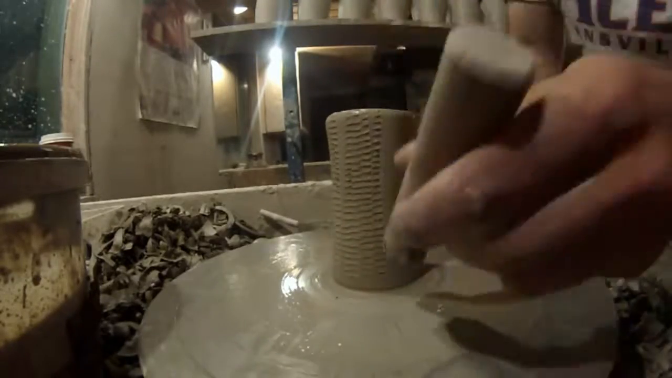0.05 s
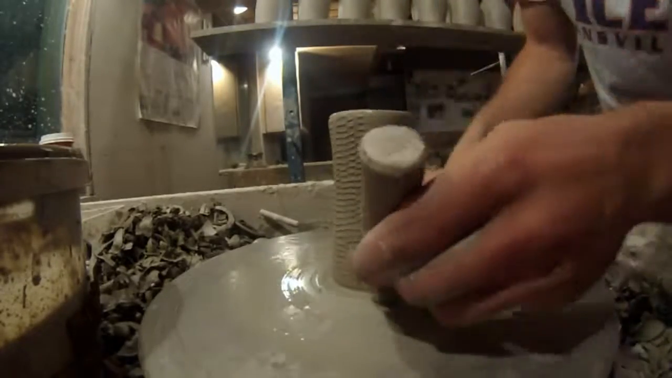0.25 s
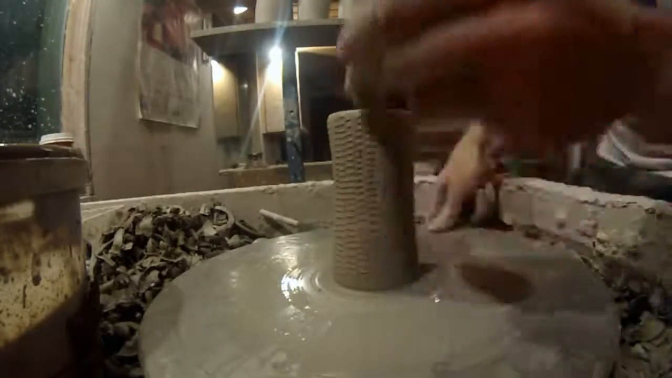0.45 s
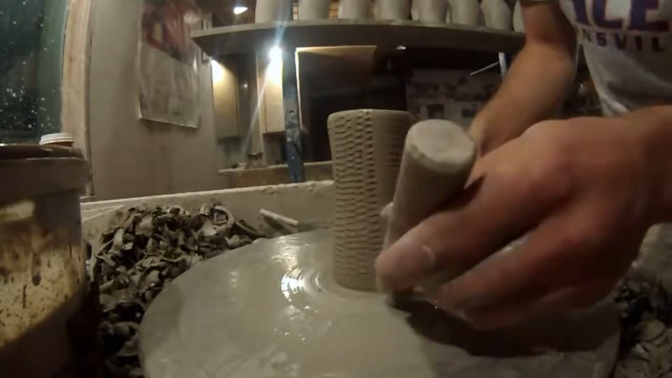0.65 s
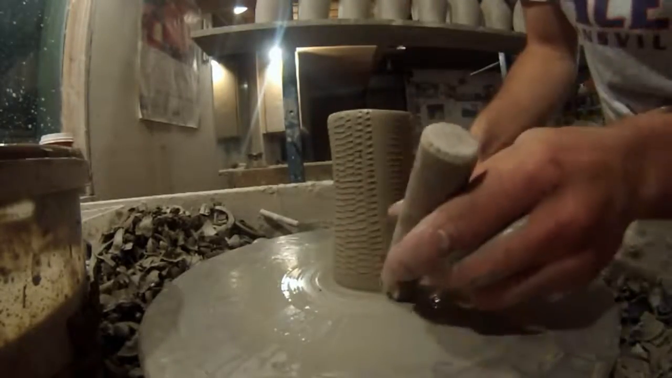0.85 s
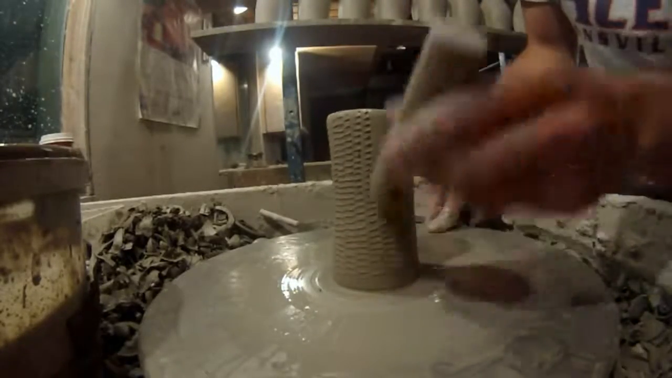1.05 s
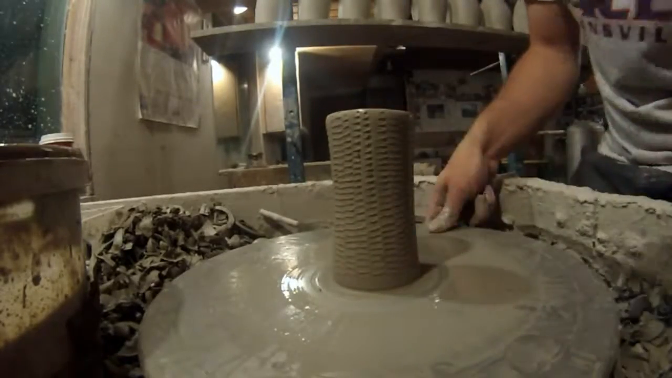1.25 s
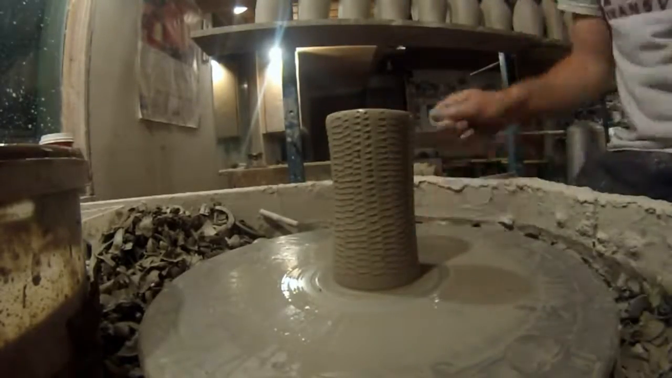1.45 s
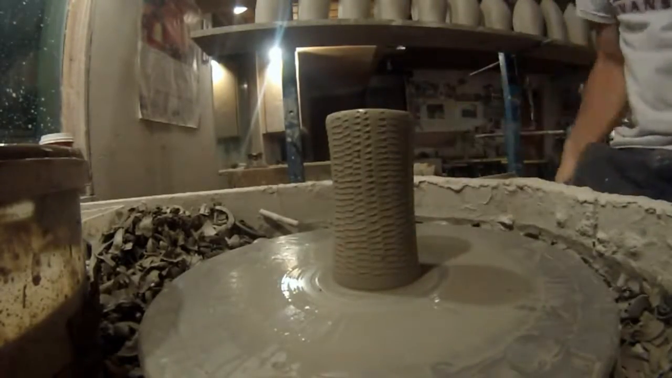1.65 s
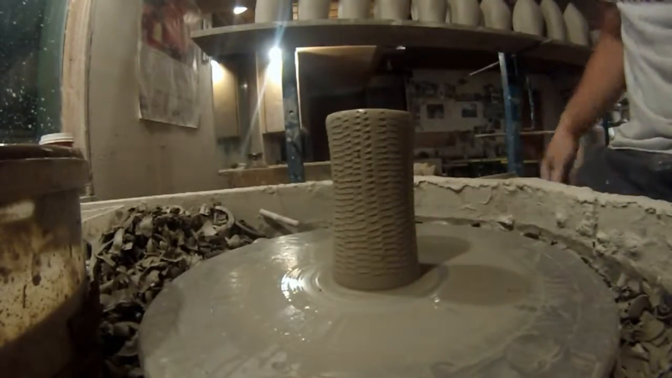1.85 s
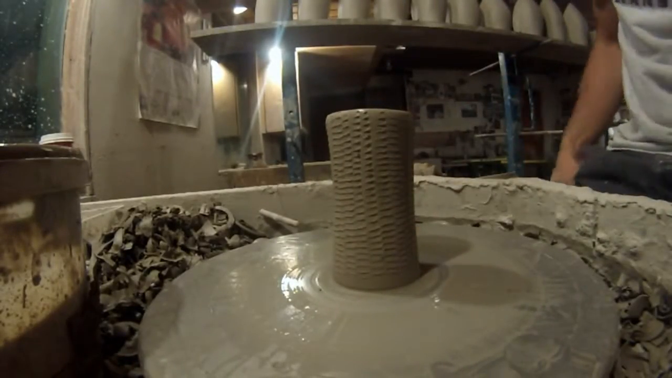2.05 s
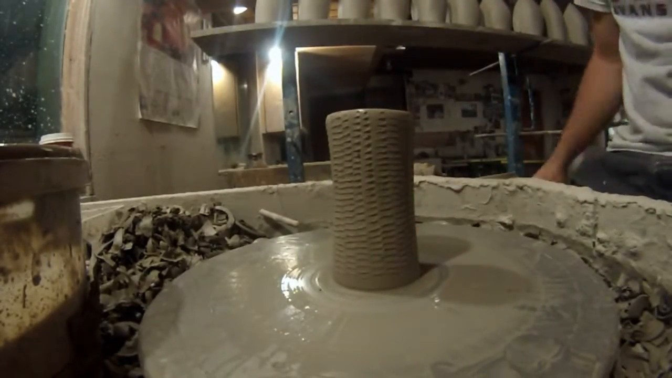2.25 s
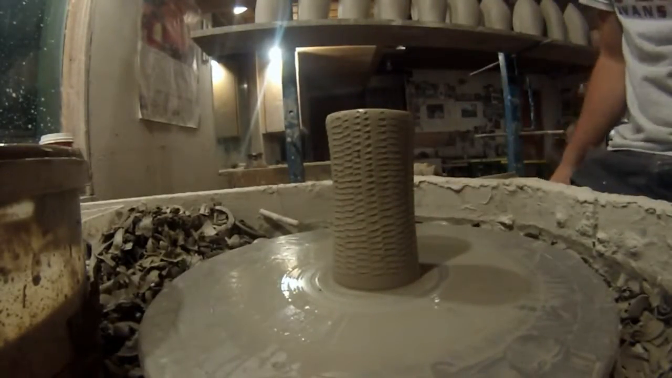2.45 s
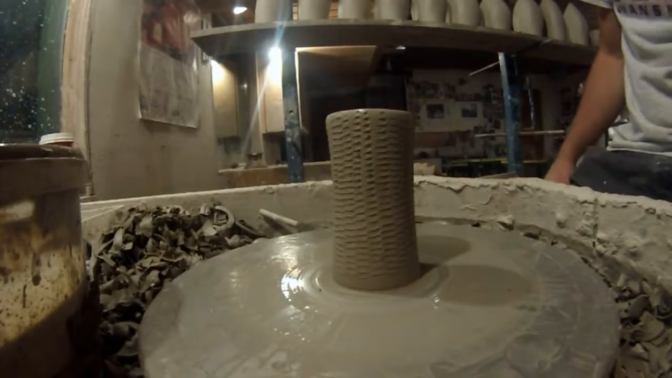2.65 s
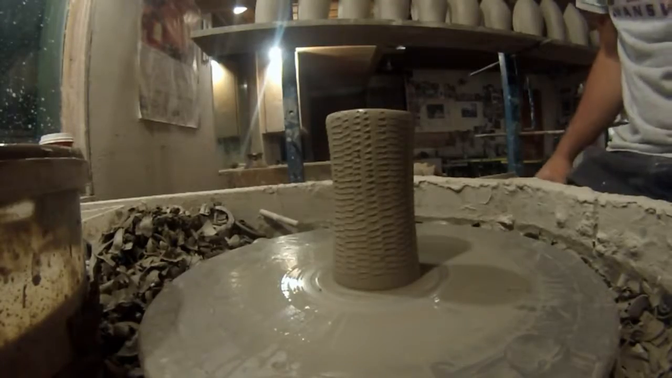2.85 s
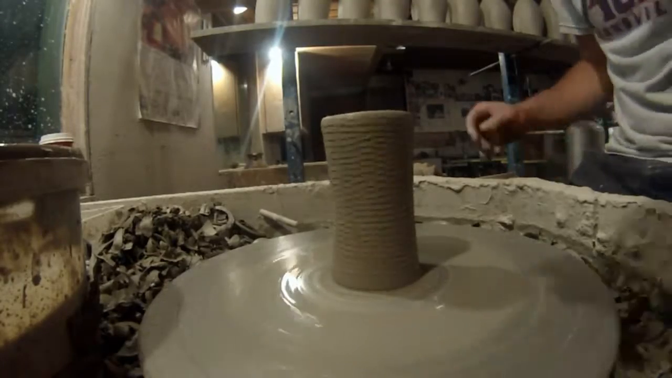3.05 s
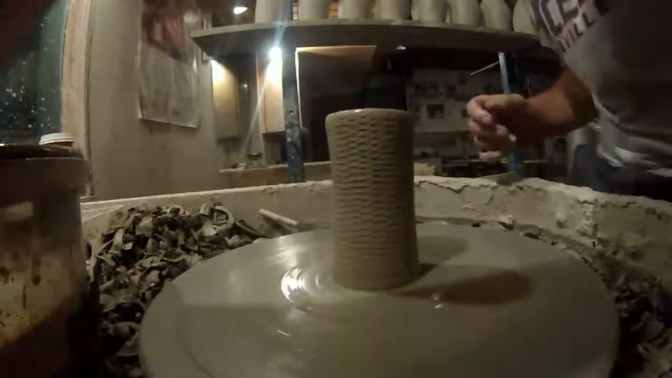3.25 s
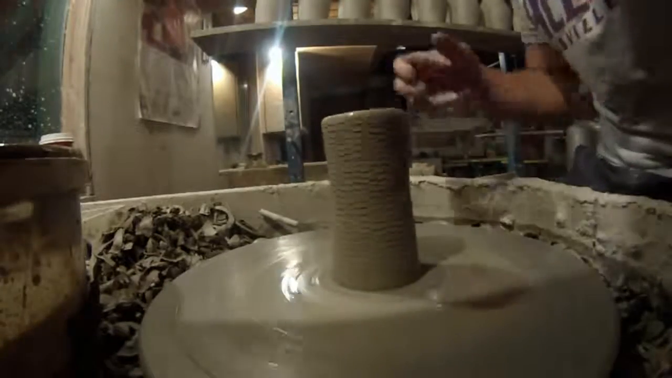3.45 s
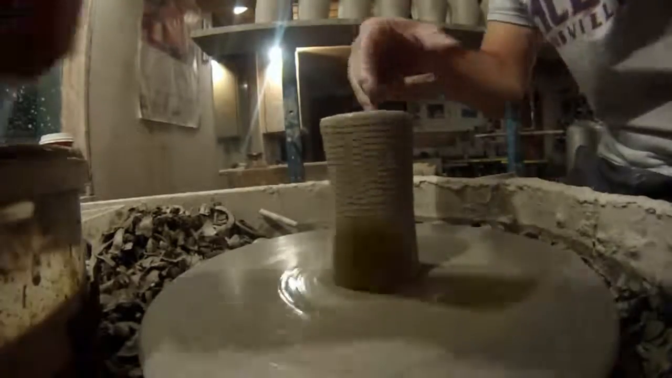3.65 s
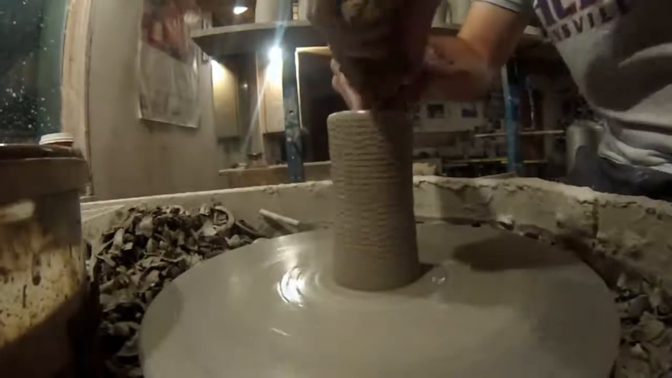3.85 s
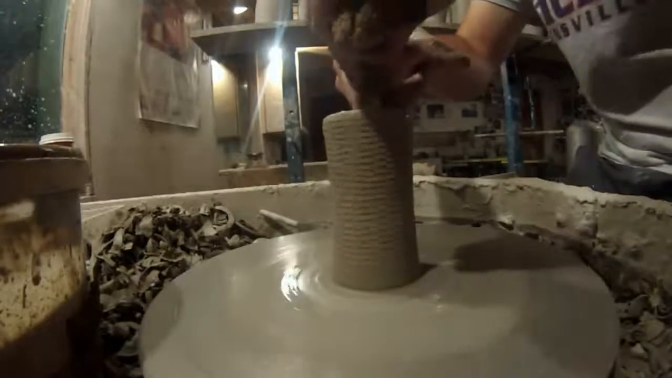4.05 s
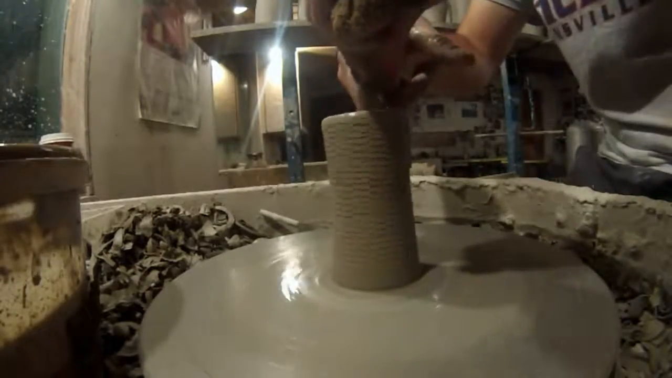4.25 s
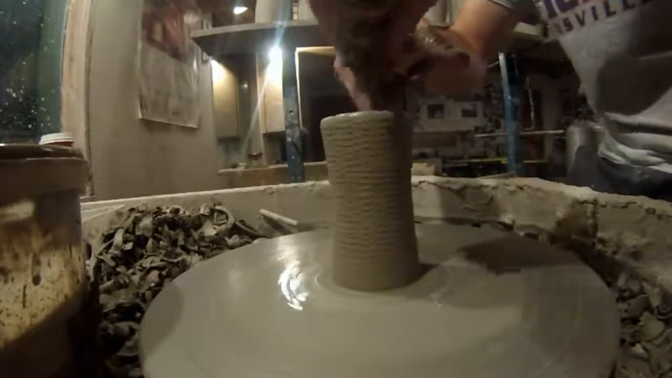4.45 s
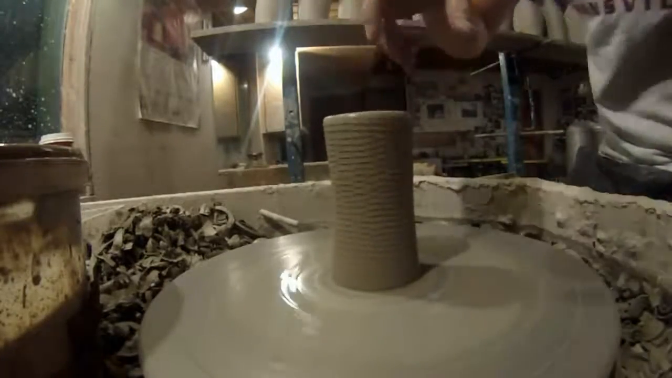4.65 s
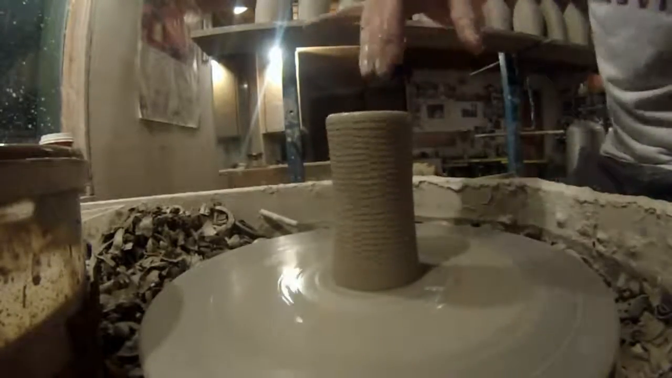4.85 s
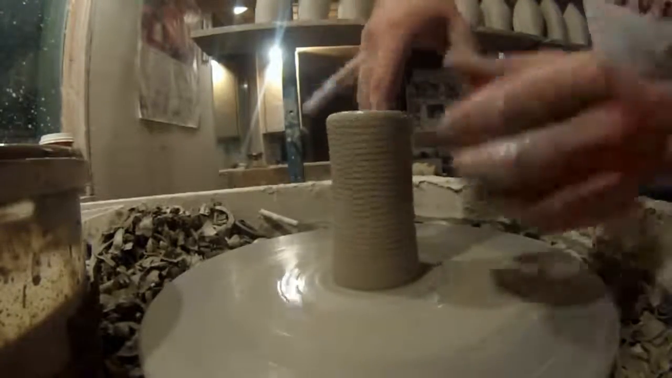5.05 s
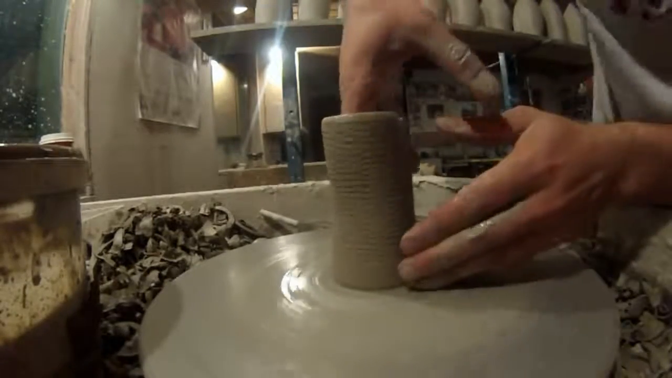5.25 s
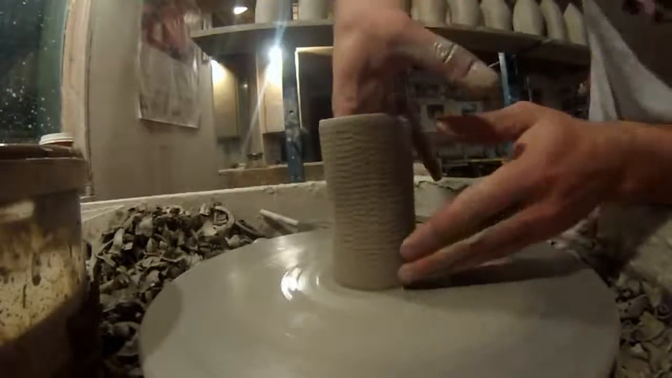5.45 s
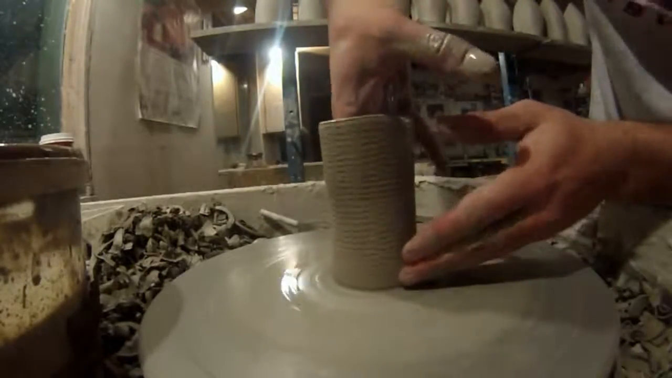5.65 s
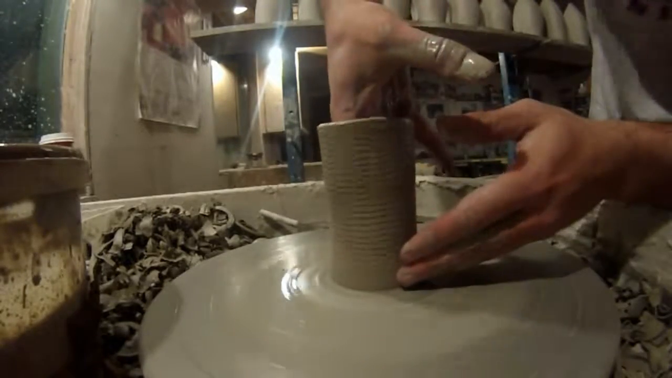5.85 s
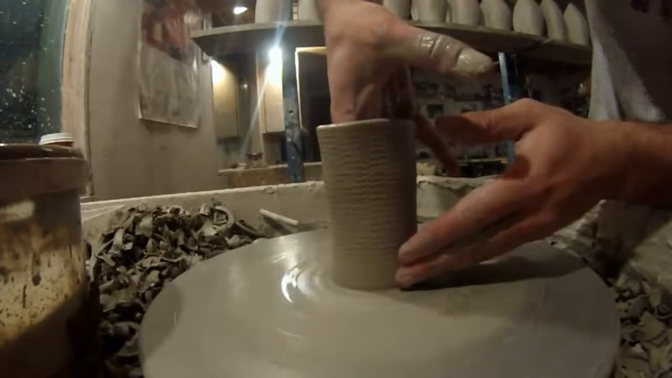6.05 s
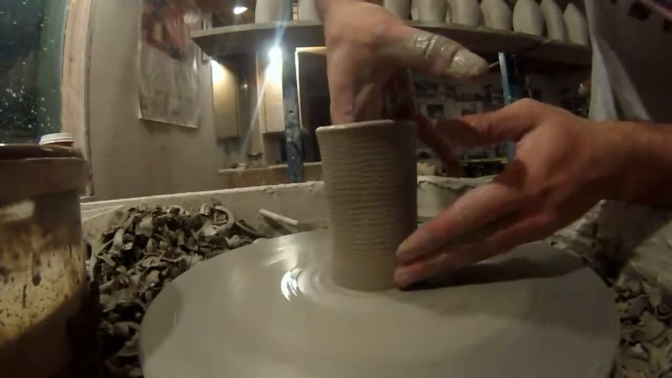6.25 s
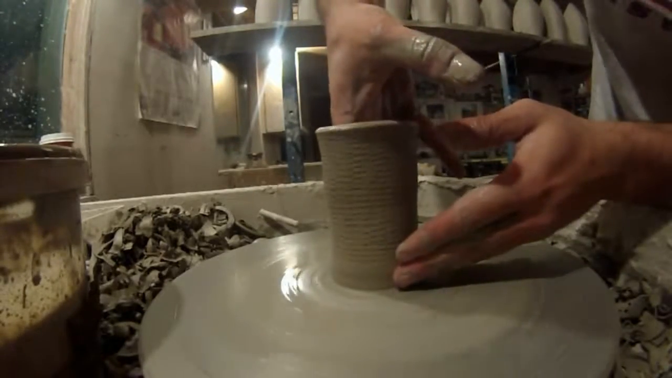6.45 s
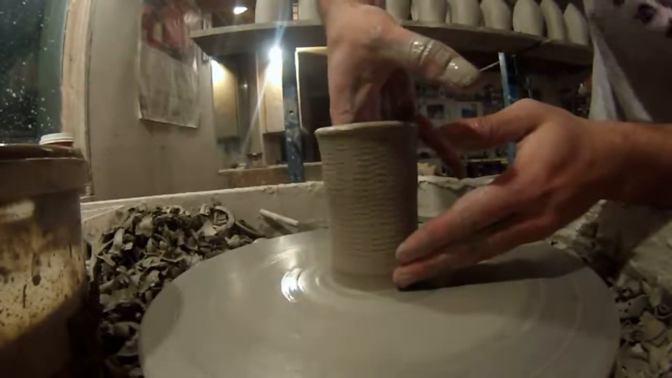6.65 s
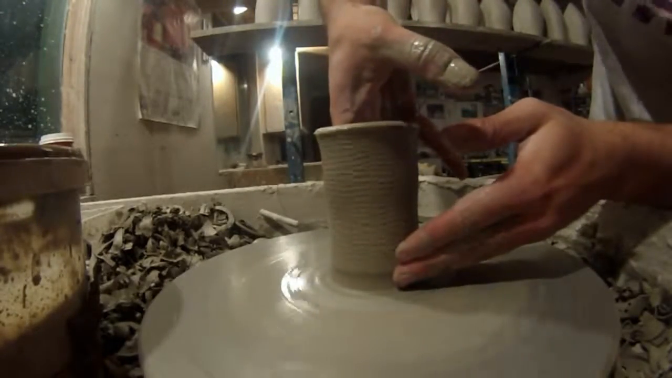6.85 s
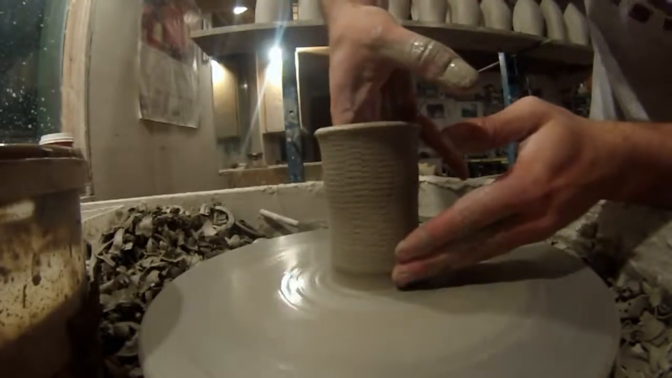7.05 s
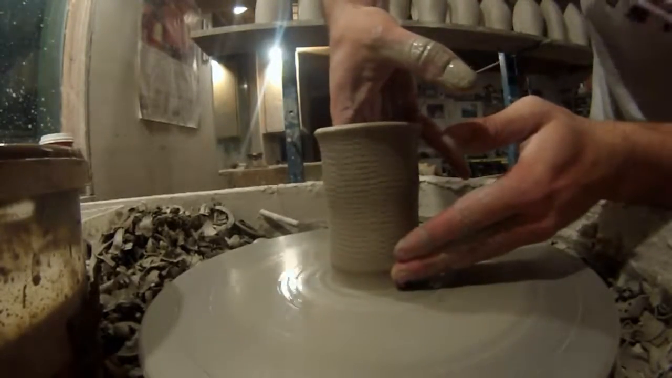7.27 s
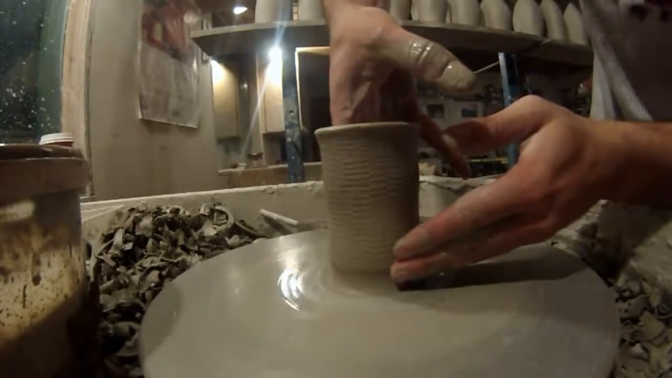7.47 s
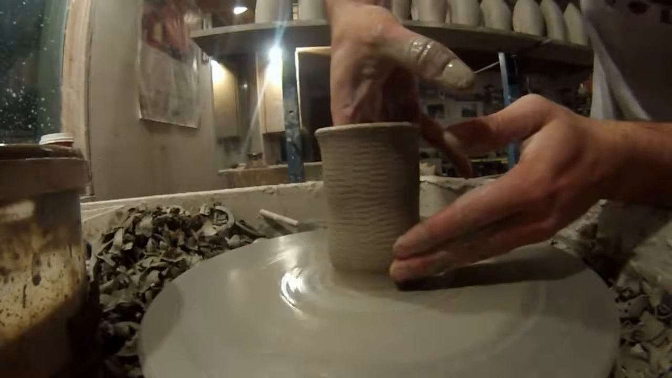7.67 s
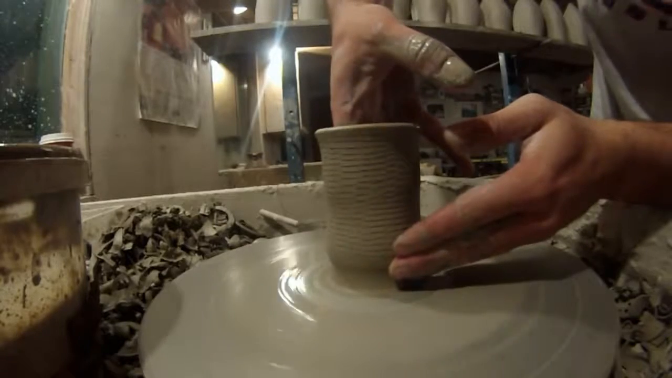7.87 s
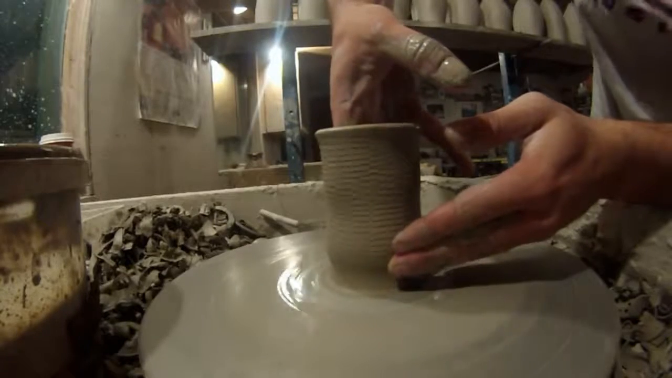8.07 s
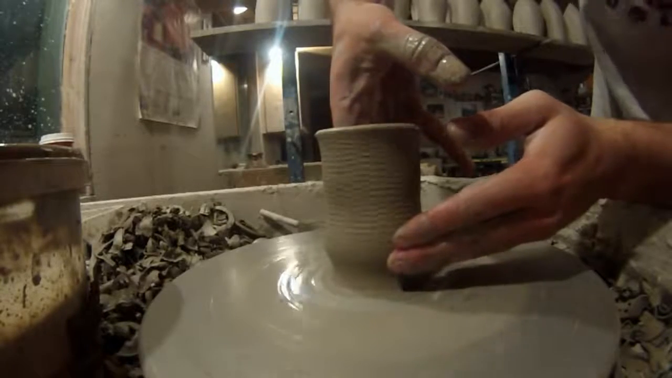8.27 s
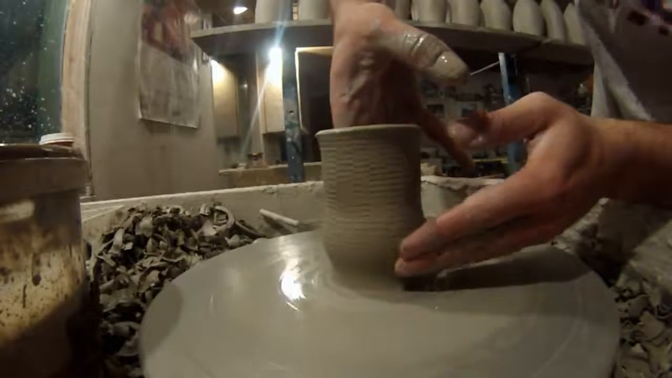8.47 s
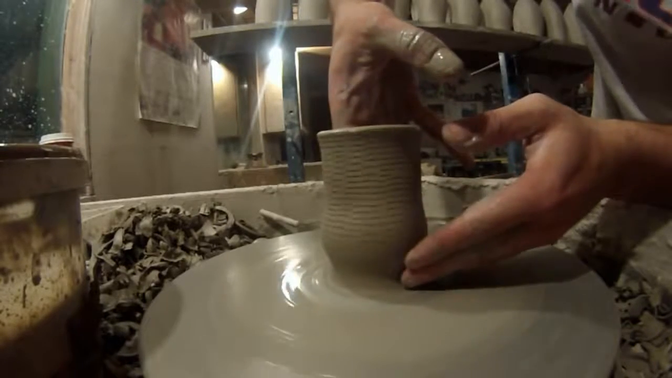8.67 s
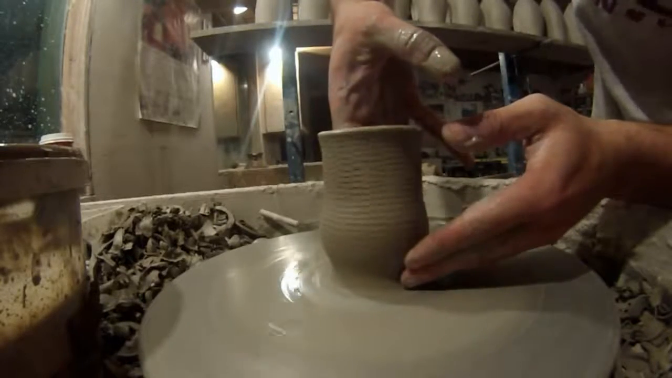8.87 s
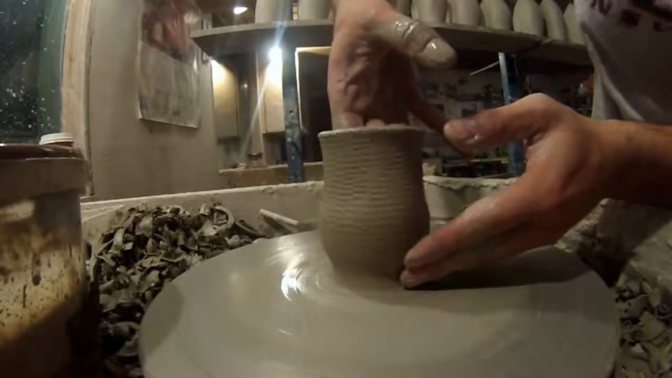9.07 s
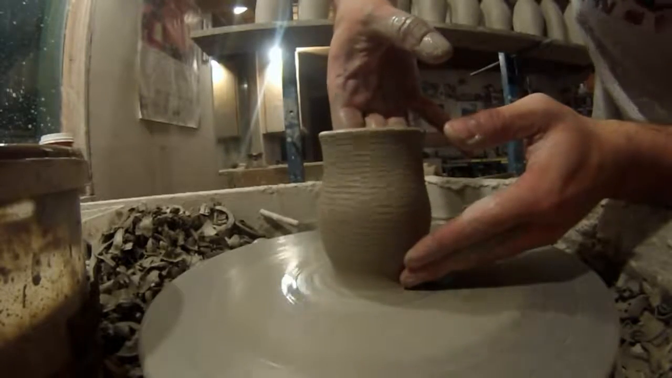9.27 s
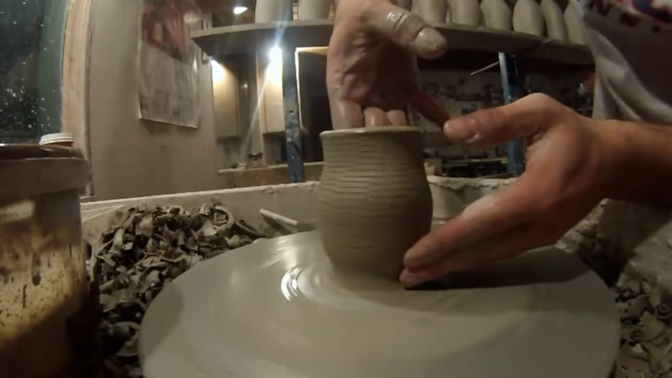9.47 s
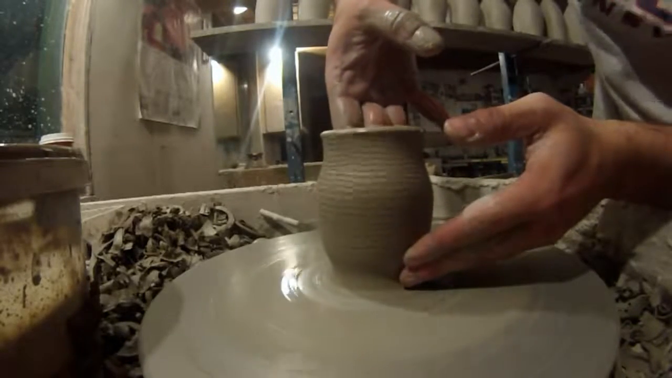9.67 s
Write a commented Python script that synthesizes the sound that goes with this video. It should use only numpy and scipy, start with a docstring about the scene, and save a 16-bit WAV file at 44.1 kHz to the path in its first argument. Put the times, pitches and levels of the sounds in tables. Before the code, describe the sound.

A potter's wheel idles softly under steady hiss, a hard object clacks, then the motor thumps in and hums roughly while hands load the clay.

```python
"""Electric potter's wheel

A wheel idles with a soft rumble over steady hiss; hands brush past, something hard clacks, and the drive thumps in.
The motor is a fluttering tone with low noise from the shaking frame; a faint whir, a moving noise band, climbs.
Hands then load the clay: the hum's pitch sags and recovers, among jolts (damped sine pushes) and wet rubs.
The clack is a set of fading tones with gritty noise; brushing is noise with a ragged level."""
import sys
import numpy as np
from scipy import signal
from scipy.fft import rfft, irfft
from scipy.io import wavfile
from scipy.ndimage import uniform_filter1d

SR = 44100
rng = np.random.default_rng(int(sys.argv[2]) if len(sys.argv) > 2 else 0)


def waveform_to_disk(signal):
    """Save audio, clipped to [-1, 1], as 16-bit WAV at the path in sys.argv[1]."""
    frames = np.transpose(np.atleast_2d(signal))
    scaled = np.clip(frames, -1, 1) * 32767
    samples = np.round(scaled).astype(np.int16)
    wavfile.write(sys.argv[1], SR, samples)


N = 428211  # length in samples
T = np.arange(N) / SR  # time in seconds
# when the hands lean on the clay and load the drive, and how long until they press fully
PRESS_S, PRESS_RISE_S = 4.5, 0.76


def undb(db):
    """Turn decibels into a gain."""
    return 10 ** (np.asarray(db) / 20)


def unit(x):
    """Scale a sound to an rms of 1."""
    return x / np.sqrt(np.mean(x ** 2))


def curves(table):
    """Join the points of each column after the first by straight lines in time."""
    s, *columns = np.transpose(table)
    return [np.interp(T, s, column) for column in columns]


def ramp(start_s, rise_s):
    """Rise in a straight line from 0 to 1, beginning at a given time."""
    return np.clip((T - start_s) / rise_s, 0, 1)


def bell(centre_s, width_s):
    """A smooth bump in time that reaches 1 at its centre."""
    return np.exp(-.5 * ((T - centre_s) / width_s) ** 2)


def noise(colour, peaks=()):
    """Noise of rms 1 with a smooth spectrum, silent above its last point, and optional resonances."""
    f = np.fft.rfftfreq(N, 1 / SR)
    hz, db = np.transpose(colour)
    shape_db = np.interp(np.log(f + 1), np.log(hz), db, right=-np.inf)
    for centre_hz, width_hz, boost_db in peaks:
        shape_db = shape_db + boost_db / (1 + (2 * (f - centre_hz) / width_hz) ** 2)
    white = rng.standard_normal(N)
    return unit(irfft(rfft(white) * undb(shape_db), N))


def walk(rate):
    """Smooth random movement of rms 1 that changes about rate times a second."""
    k = max(int(SR / rate), 1)
    steps = np.repeat(rng.standard_normal(N // k + 1), k)[:N]
    return unit(uniform_filter1d(uniform_filter1d(steps, k), k))


def add(out, start_s, sound):
    """Mix a sound in at a given time."""
    i = int(start_s * SR)
    out[i:i + len(sound)] += sound[:N - i]


def wavering(hz, jitter, rate):
    """A tone of rms 1 whose pitch strays by a share of itself, rate times a second."""
    pitch_hz = hz * (1 + jitter * walk(rate))
    return np.sqrt(2) * np.sin(2 * np.pi * np.cumsum(pitch_hz) / SR)


def scraping(hz, width_hz, clear_db):
    """A rubbed resonance of rms 1: a noise band around a pitch that may move, with a tone at its heart."""
    rough = (walk(width_hz) + 1j * walk(width_hz)) / np.sqrt(2)
    tone = undb(clear_db) * np.exp(1j * walk(width_hz / 2))
    carrier = np.exp(2j * np.pi * np.cumsum(hz) / SR)
    return unit(np.real((rough + tone) * carrier))


# Spectrum of the hiss: pitch_hz [Hz], level_db [dB per Hz]
HISS_SPECTRUM = [(200, -3.5), (780, -6.5), (1080, -10), (1700, -4.5), (2050, -11.5), (2700, -10.5),
                 (3300, -7), (3850, -10), (4300, -19.5), (5300, -24), (7300, -27.5), (8500, -30),
                 (12700, -32.5), (18000, -50.5)]
# Resonances in the hiss: pitch_hz [Hz], width_hz [Hz], boost_db [dB]
HISS_RESONANCES = [(1355, 336, 8.5), (2330, 390, 6.5)]


def hiss():
    """Steady noise sounds slightly hollow because two resonances stand out of it."""
    return undb(-53.0) * noise(HISS_SPECTRUM, HISS_RESONANCES)


# Spectrum of the idling rumble: pitch_hz [Hz], level_db [dB per Hz]
IDLE_SPECTRUM = [(15, -5.5), (40, 0), (90, -3), (125, -4), (160, -6), (200, -12.5), (260, -14),
                 (330, -17.5), (450, -24.5), (800, -25), (1500, -43.5)]


def idling(rumble_db=-45.5, drone_db=-51, fade_db_per_s=1, swell_db=1):
    """The slowly turning wheel rumbles a little unevenly as it fades, with a thin steady hum."""
    change_db = swell_db * walk(5) - fade_db_per_s * T
    rumble = noise(IDLE_SPECTRUM) * undb(rumble_db + change_db)
    drone = wavering(88, jitter=0.1397, rate=50) * undb(drone_db + change_db)
    thin_hum = undb(-57.0) * wavering(156, jitter=.008, rate=12)
    return rumble + drone + thin_hum


# Soft brushing of hand and tool: centre_s [s], width_s [s], level_db [dB]
BRUSH_STROKES = [(.33, .03, -64), (.475, .013, -51), (.81, 0.02, -54.5), (.875, .028, -50.5),
                 (.945, 0.022, -55)]
# Spectrum of their dry rustle: pitch_hz [Hz], level_db [dB per Hz]
BRUSH_SPECTRUM = [(500, -3), (1200, -4), (1720, 9.5), (1980, -6), (2330, 3), (2700, -8), (3500, -13),
                  (4500, -17), (7000, -25), (9000, -34), (14000, -52)]


def brushing(grain_db=3.0, grain_rate=130):
    """Hand and tool brush past: rustling noise swells and fades with a ragged grain."""
    touch = sum(undb(db) * bell(centre_s, width_s) for centre_s, width_s, db in BRUSH_STROKES)
    grain = undb(grain_db * walk(grain_rate))
    return touch * grain * noise(BRUSH_SPECTRUM)


# Wet fingers squeaking on the turning clay:
# start_s [s], length_s [s], middle pitch_hz [Hz], glide_hz_per_s [Hz per s], level_db [dB]
WET_RUBS = [(5.04, 0.054, 765, 0, -58), (6.021, .075, 790, 1200, -50), (6.125, 0.07, 540.4, 600, -51.5)]


def rubbing():
    """Wet fingers on the clay excite short, rough squeaks, some gliding up in pitch."""
    out = np.zeros(N)
    for start_s, length_s, hz, glide_hz_per_s, db in WET_RUBS:
        n = int(length_s * SR)
        pitch_hz = hz + glide_hz_per_s * (T - length_s / 2)
        squeak = scraping(pitch_hz, width_hz=220, clear_db=-1)[:n]
        add(out, start_s, undb(db) * squeak * signal.windows.tukey(n, .4))
    return out


# Ring of the hard object: pitch_hz [Hz], level_db [dB within the ring], t60_s [s to fade by 60 dB]
CLACK_RING = [(612, -4, .14), (1003, -9, .08), (1324, -15, .12), (1434, -8, .1), (1640, -6, .1),
              (1692, -5, .12), (1787, -13, .12), (2260, -3, .09), (2326, 1, .1), (2408, -4, .07),
              (2689, -2, .08), (2790, -11, .1), (2837, -10, .1), (2950, -8, .08), (3160, -5, .1),
              (3208, -8, .09), (3480, -12, .09), (4016, -19, .1), (4880, -22, .06), (5550, -24, .08)]
# Spectrum of the gritty crack: pitch_hz [Hz], level_db [dB per Hz]
CRACK_SPECTRUM = [(250, -13), (650, -3), (1100, -3), (1900, -5), (2300, 9), (2500, -3), (2800, 3),
                  (3300, -1), (4200, -17), (6000, -22), (8000, -38), (14000, -52)]
# Spectrum of the bright tick that starts each contact: pitch_hz [Hz], level_db [dB per Hz]
TICK_SPECTRUM = [(1000, -10), (3500, -2), (6500, 0), (8000, -13), (10500, -19), (14000, -40)]
# Contacts of the chattering object: start_s [s], level_db [dB]
CLACK_CONTACTS = [(2.0451, -33), (2.0484, -30), (2.0565, -40), (2.0635, -43), (2.073, -46), (2.0868, -54),
                  (2.094, -53)]


def clack(ring_db=-34.5, ring_rise_s=0.0017, rise_s=0.0004, grain_db=3.0):
    """A struck hard object rings and chatters: each touch is a tick and a crack that fades in the room."""
    crack_t60_s, room_t60_s, tick_t60_s = 0.029, 0.22, .016
    room_db, tick_db = -13.0, -22  # against the level of the contact
    out, t = np.zeros(N), T[:SR // 2]
    ring = np.zeros(len(t))
    for hz, db, t60_s in CLACK_RING:
        phase = 2 * np.pi * rng.random()
        ring += undb(db - 60 * t / t60_s) * np.sin(2 * np.pi * hz * t + phase)
    ring_attack = 1 - np.exp(-t / ring_rise_s)
    add(out, CLACK_CONTACTS[0][0], undb(ring_db) * ring_attack * ring)

    attack = 1 - np.exp(-(t / rise_s) ** 2)
    fade = undb(-60 * t / crack_t60_s) + undb(room_db - 60 * t / room_t60_s)
    for start_s, db in CLACK_CONTACTS:
        grit = unit(noise(CRACK_SPECTRUM) * undb(grain_db * walk(900)))[:len(t)]
        tick = undb(tick_db - 60 * t / tick_t60_s) * noise(TICK_SPECTRUM)[:len(t)]
        add(out, start_s, undb(db) * attack * (tick + fade * grit))
    return out


# The whir climbs, drops as the hands bear down, then settles: time_s [s], pitch_hz [Hz], level_db [dB]
WHIR_PATH = [(3.1, 482, -56), (3.28, 515, -55), (3.5, 556, -54), (3.8, 599.7, -54), (3.97, 635.2, -48),
             (4.4, 656, -51), (4.68, 643.2, -52), (4.82, 620.3, -63), (5.02, 519, -60), (5.2, 500.3, -50),
             (5.9, 511, -56), (6.38, 590, -54), (6.7, 575, -58), (9.7, 579, -56.5)]


def whirring(fade_s=.05):
    """A rough band with a weak tone climbs as the wheel spins up, then drops under the hands."""
    hz, db = curves(WHIR_PATH)
    whir = scraping(hz, width_hz=205, clear_db=-6.5)
    return ramp(WHIR_PATH[0][0], fade_s) * undb(db) * whir


def knock(hz, cycles):
    """A heavily damped jolt: a push that snaps over into a pull, centred in a tenth of a second."""
    t = T[:SR // 10] - T[SR // 20]
    return -np.exp(-np.abs(t) * hz / cycles) * np.sin(2 * np.pi * hz * t)


# Hardest jolts of the drive, each with a small, higher snap (levels are before damping):
# centre_s [s], level_db [dB], pitch_hz [Hz], snap_level_db [dB]
HARD_JOLTS = [(3.028, -22, 310, -41), (4.8423, -28, 280, -48), (5.2901, -25, 290, -36),
              (5.313, -25, 270.5, -42), (5.4513, -28, 400, -42), (5.7565, -31, 400.3, -38),
              (5.8728, -25, 271, -50), (5.896, -27, 290, -39), (5.9528, -29, 268.9, -41),
              (6.0654, -26, 299.2, -40), (6.2918, -25, 300, -47), (6.4783, -23.5, 320, -50),
              (6.5433, -25, 300, -46), (6.658, -34, 300, -42), (6.8594, -29, 289.5, -37),
              (7.0228, -27, 290, -55), (7.3221, -27, 320, -35), (7.3517, -24, 260.7, -52),
              (7.3723, -30, 320.2, -46), (7.5066, -19.5, 308, -39), (7.628, -32, 279.7, -42),
              (8.2834, -24.5, 270, -40), (8.3735, -27, 330, -43), (8.6289, -27, 269.6, -41),
              (9.082, -27, 250, -56), (9.2264, -32, 264.4, -50), (9.3061, -24.5, 290.3, -52),
              (9.4198, -24, 311.7, -40), (9.4699, -26, 309.8, -46), (9.536, -30, 319.7, -43),
              (9.5956, -27, 290, -43), (9.6264, -24, 280, -45)]


def knocks(count=55, thump_s=3.024, jolt_cycles=0.47):
    """A bump and a deep thump as the drive kicks in, then hard jolts and random lesser bumps under load."""
    out, lead_s = np.zeros(N), T[SR // 20]  # a jolt's centre lies this far into its sound
    add(out, 3.012 - lead_s, undb(-27) * knock(250, cycles=0.37))
    add(out, thump_s - lead_s, -undb(-16.0) * knock(49, cycles=0.28))
    for centre_s, db, hz, snap_db in HARD_JOLTS:
        jolt = undb(db) * knock(hz, cycles=jolt_cycles)
        snap = undb(snap_db) * knock(685, cycles=0.38)
        add(out, centre_s - lead_s, jolt + snap)
    for when, size, pitch in rng.random((count, 3)):
        centre_s = PRESS_S + when * (T[-1] - PRESS_S)
        bump_db = -41.5 + 6 * size
        bump_hz = 257 + 200 * pitch
        add(out, centre_s - lead_s, undb(bump_db) * knock(bump_hz, cycles=jolt_cycles))
    return out


# Pitch of the motor's hum, sagging and recovering: time_s [s], pitch_hz [Hz]
MOTOR_PITCH = [(3.07, 127.7), (3.2, 117.3), (3.6, 118), (4.15, 126.8), (4.36, 116.7), (4.5, 125),
               (4.65, 113), (5.14, 127), (5.32, 96.5), (5.44, 117.8), (5.92, 105.2), (6.06, 118.2),
               (6.16, 107.1), (6.54, 123.9), (6.62, 109.1), (6.88, 124.1), (7.08, 99.2), (7.4, 121.6),
               (7.46, 109.7), (7.8, 117.7), (8.06, 106.5), (8.26, 127.8), (8.38, 113.8), (9.0, 121.1),
               (9.08, 111.4), (9.68, 114.1)]
# Spectrum of the frame's judder: pitch_hz [Hz], level_db [dB per Hz]
JUDDER_SPECTRUM = [(50, -44.5), (110, -3.5), (170, 2), (240, -0.65), (300, -9), (380, -15.5), (500, -17),
                   (640, -22), (800, -27), (1100, -38), (2000, -77)]
# Spectrum of the frame's deep rumble: pitch_hz [Hz], level_db [dB per Hz]
RUMBLE_SPECTRUM = [(8, 2), (30, 7), (55, 5), (80, 12.5), (130, -18.5), (300, -56)]


def drive(start_s=3.008, start_rise_s=0.0059, pull_up_share=0.752, pull_up_s=.02):
    """The motor pulls up to speed, hums with a fluttering pitch and shakes the frame; load roughens it."""
    load = ramp(PRESS_S, PRESS_RISE_S)
    speed = 1 - pull_up_share * np.exp(-np.abs(T - start_s) / pull_up_s)
    hz = curves(MOTOR_PITCH)[0] * speed * (1 + 0.0505 * walk(45))
    flutter = .15 + .03 * load  # share of the pitch
    ease_db = -2 * bell(3.55, 0.12)  # the hum eases briefly after the first surge
    load_db = load * (-0.5 + 0.44 * (T - PRESS_S))  # under load it slowly grows
    hum_db = -30.5 + ease_db + load_db + 0.94 * walk(40)
    hum = wavering(hz, flutter, rate=230) * undb(hum_db)
    judder = noise(JUDDER_SPECTRUM) * undb(-36 + 1.0 * walk(70))
    rumble = noise(RUMBLE_SPECTRUM) * undb(-39.5 + 4 * load + 1.5 * walk(6))
    # faint and dry, like a bearing
    rush = undb(-61.5) * noise([(900, -17.5), (1300, -2.5), (1480, 6.0), (1700, -10.5), (2200, -38.0)])
    return ramp(start_s, start_rise_s) * (hum + judder + rumble + rush)


def scene():
    """Add up all the sounds at one microphone."""
    background = hiss() + idling()
    handling = brushing() + rubbing() + clack()
    wheel = whirring() + knocks() + drive()
    return (background + handling + wheel)[None]


def record(dry, top_hz=15300):
    """The recorder steeply cuts everything above its top frequency."""
    low_pass = signal.ellip(8, .2, 70, top_hz, fs=SR, output="sos")
    return signal.sosfilt(low_pass, dry)


dry = scene()
out = record(dry)
waveform_to_disk(out)
```